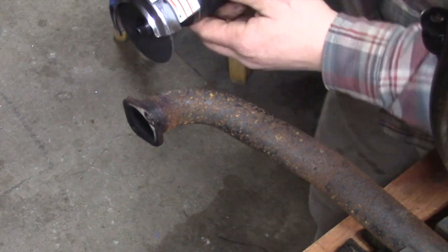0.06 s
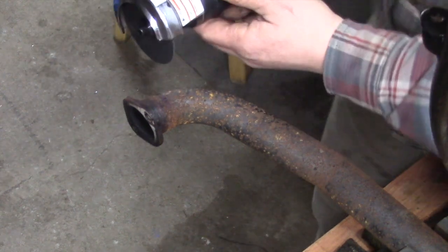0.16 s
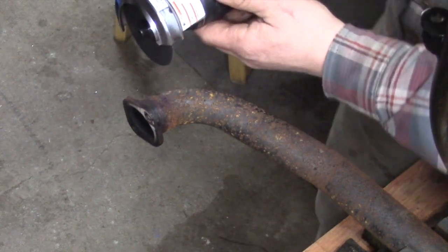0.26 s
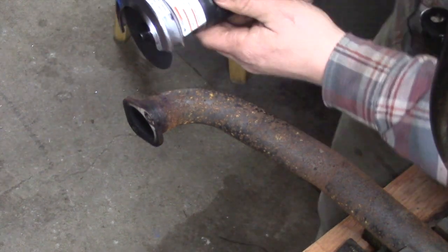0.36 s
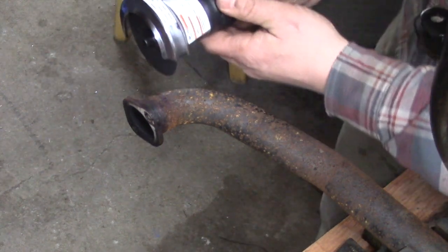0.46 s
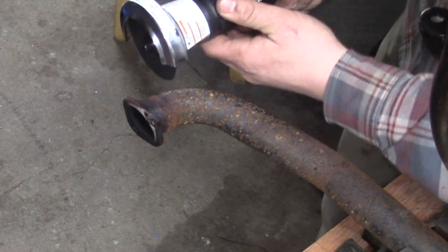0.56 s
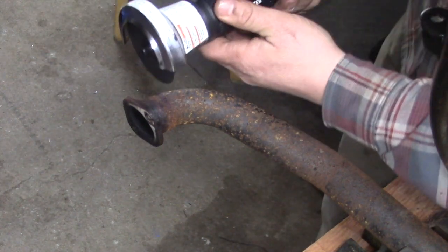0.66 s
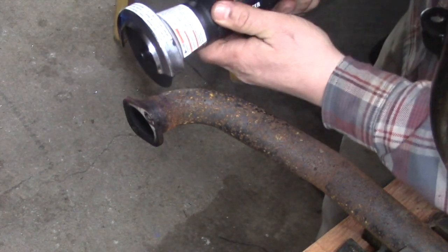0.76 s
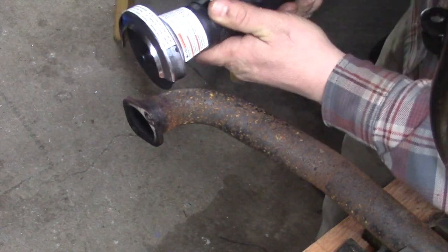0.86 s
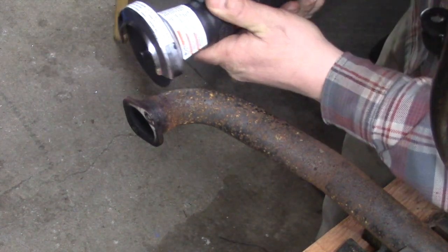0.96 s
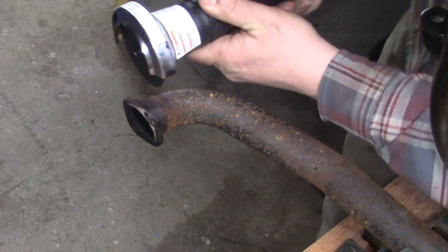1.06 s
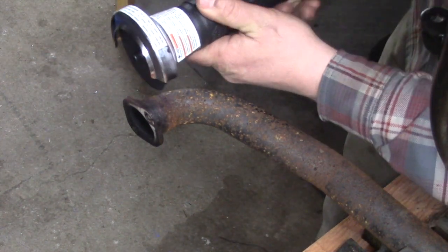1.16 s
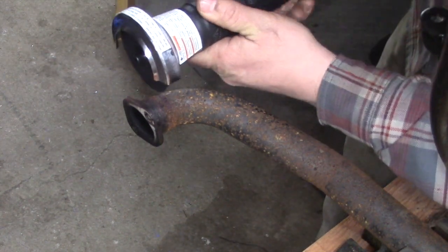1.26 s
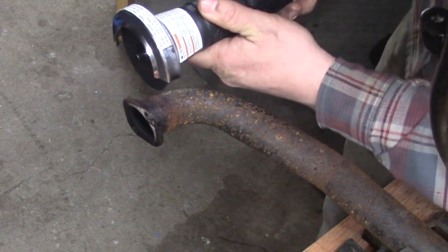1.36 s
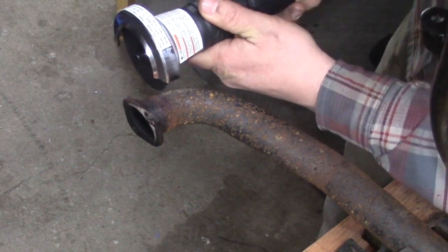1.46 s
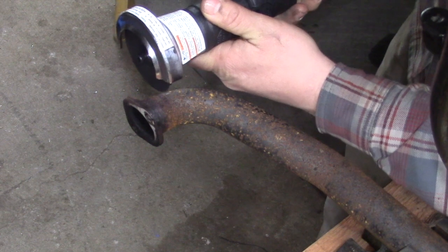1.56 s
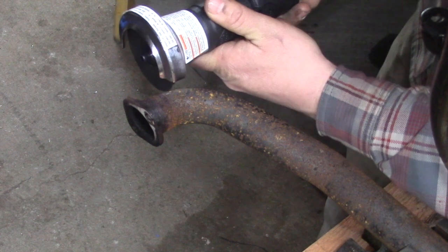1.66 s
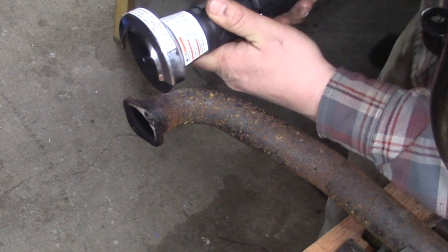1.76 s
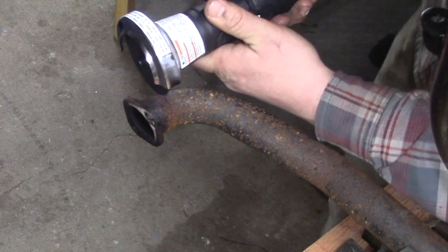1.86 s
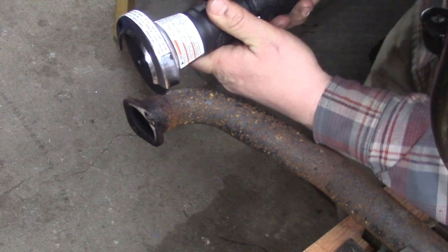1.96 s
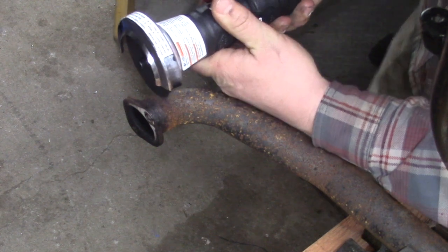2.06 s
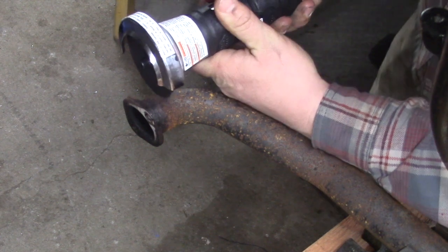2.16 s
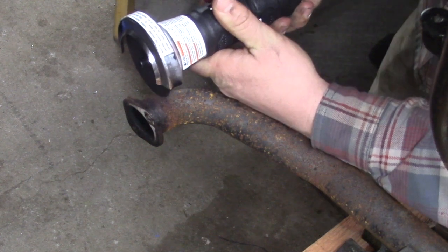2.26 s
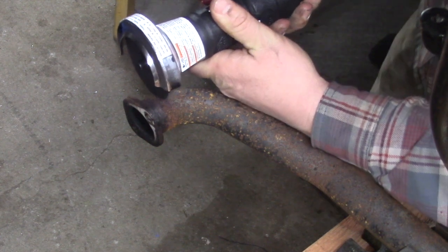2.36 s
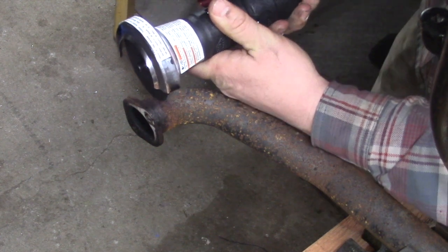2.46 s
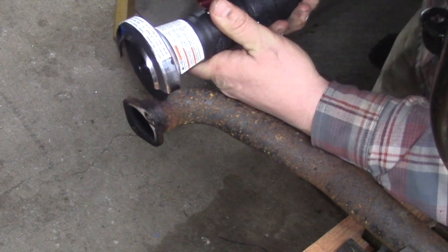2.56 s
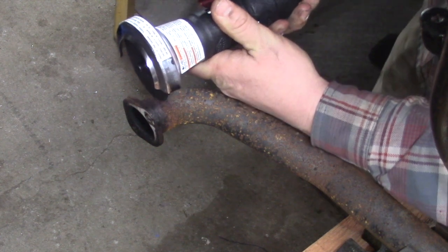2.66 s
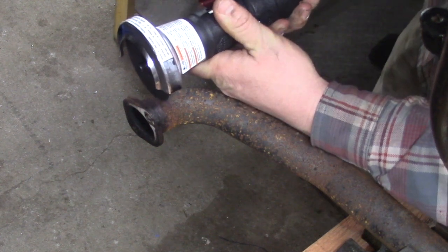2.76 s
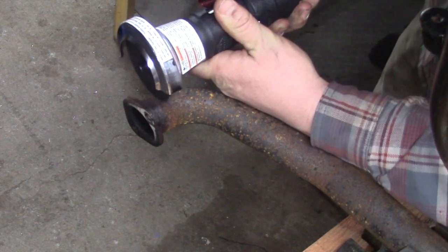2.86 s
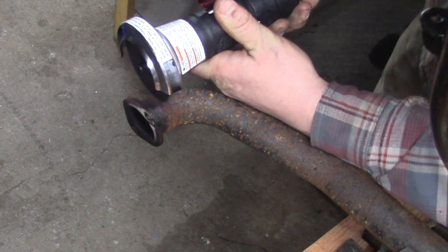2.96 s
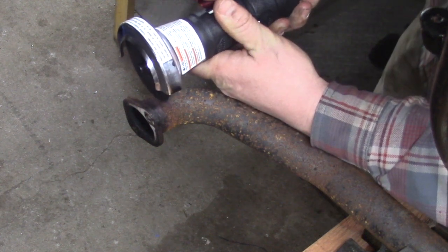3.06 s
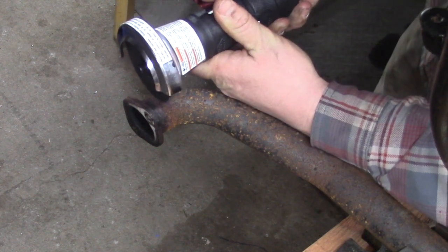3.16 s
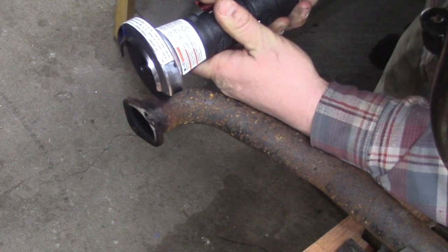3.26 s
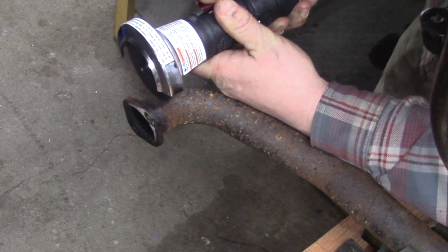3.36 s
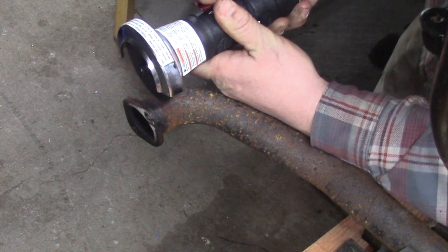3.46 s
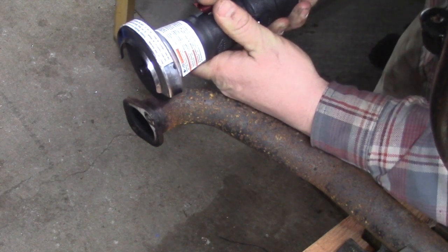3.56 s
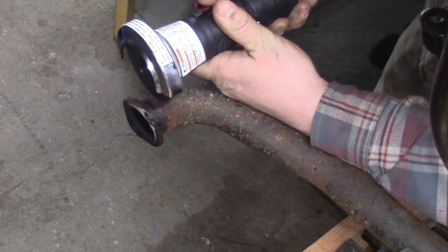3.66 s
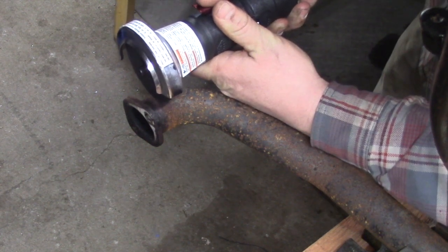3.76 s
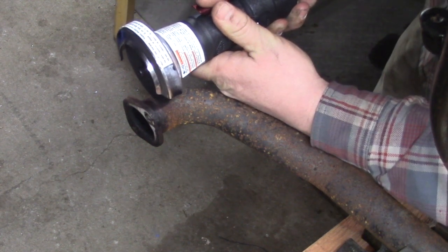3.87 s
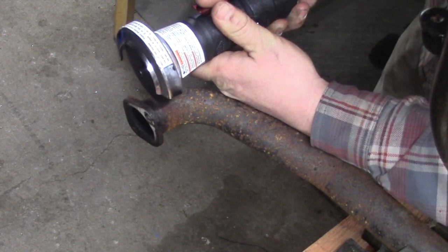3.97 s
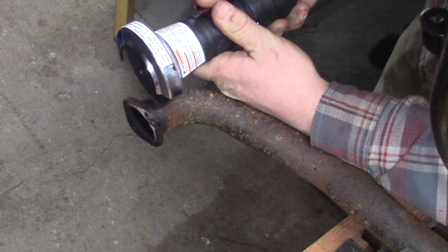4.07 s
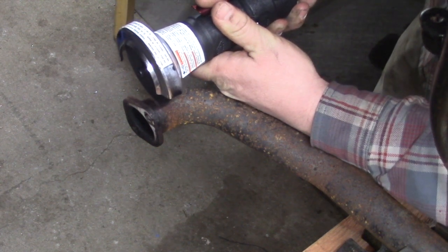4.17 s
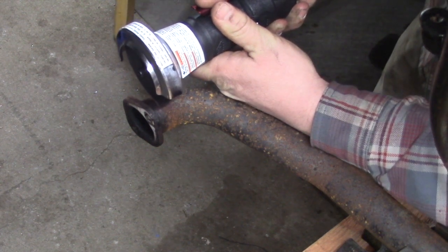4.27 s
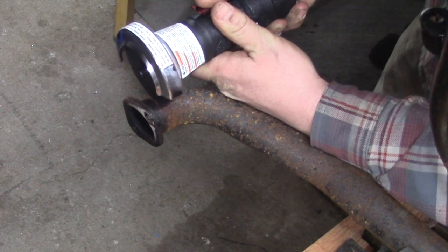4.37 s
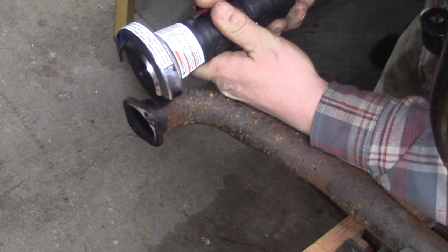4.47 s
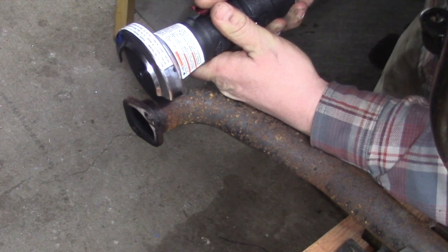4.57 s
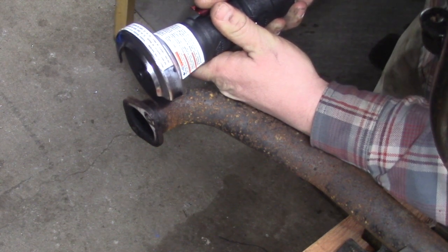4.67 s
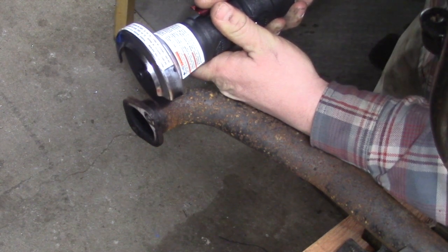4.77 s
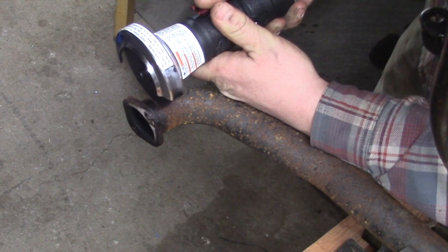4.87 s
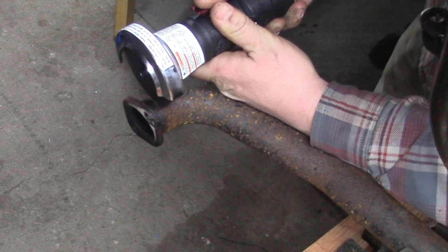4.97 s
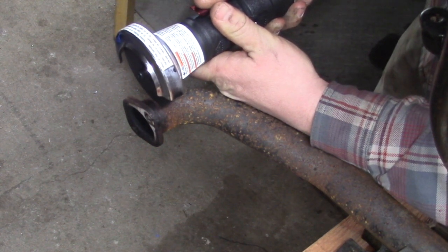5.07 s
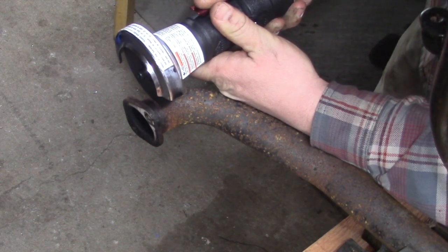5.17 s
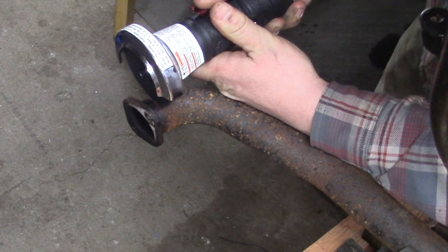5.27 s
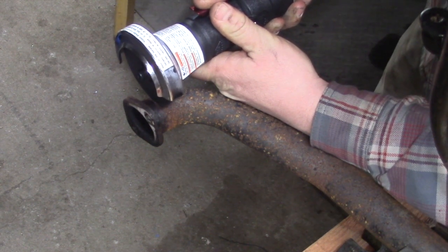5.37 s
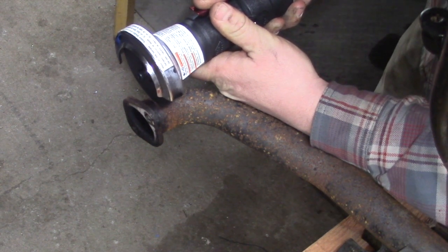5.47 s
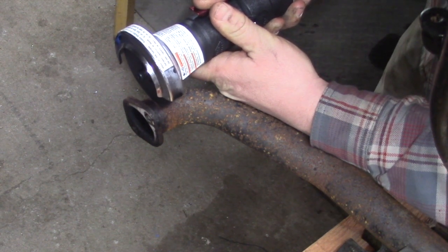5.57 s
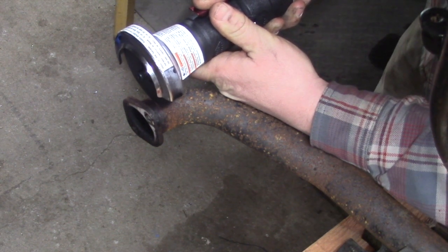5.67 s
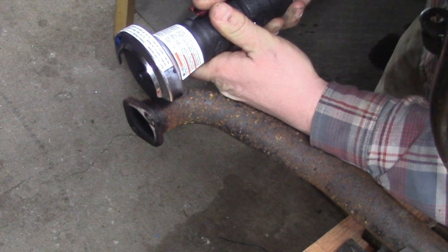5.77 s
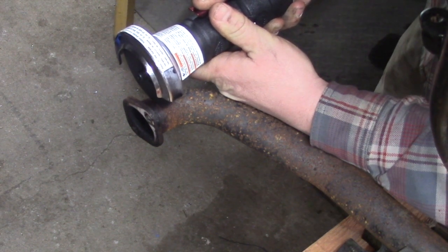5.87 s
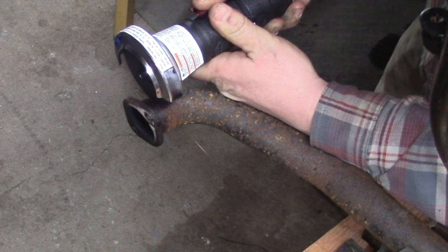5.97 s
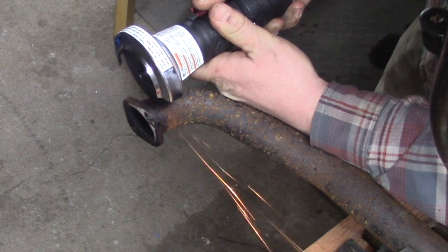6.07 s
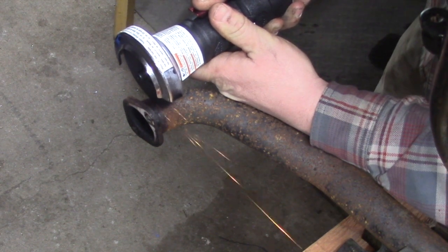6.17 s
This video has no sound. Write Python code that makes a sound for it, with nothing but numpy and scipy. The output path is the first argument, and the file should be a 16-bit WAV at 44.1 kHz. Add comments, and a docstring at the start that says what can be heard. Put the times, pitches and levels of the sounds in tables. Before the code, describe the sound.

Sleeves rustle and a lever clicks in a quiet workshop, then an air-powered cutting tool sputters, whines up loud and finally grazes steel.

```python
"""In a workshop, heard by one close microphone: hands and sleeves rustle over the room's faint noise,
with light taps, scuffs, clicks of the safety lever and dull pops as a pneumatic cut-off tool is handled.
The valve opens: leaking air rings the exhaust, the first vanes kick over and sputter, and the four-vane
motor spins up to a loud whine, made of harmonics of the vane rate over pulsing, hissing noise.
Gusts of exhaust air buffet the microphone; at last the wheel grazes a steel pipe with scraping noise."""
import sys
import numpy as np
from scipy import signal
from scipy.fft import rfft, irfft, next_fast_len
from scipy.io import wavfile

SR = 44100
rng = np.random.default_rng(int(sys.argv[2]) if len(sys.argv) > 2 else 0)


def dump_mix(stems):
    """Bounce the given channels to the path in sys.argv[1] as a 16-bit WAV at rate SR."""
    frames = np.atleast_2d(stems).T  # one column per channel
    limited = np.clip(frames, -1, 1)  # hard clip at full scale
    pcm = np.round(limited * 32767).astype(np.int16)
    wavfile.write(sys.argv[1], SR, pcm)


N = 274522
TIME = np.arange(N) / SR
STEP = 40   # samples between the points of a slow control


def from_db(db):
    """Decibels to gain."""
    return 10 ** (np.asarray(db) / 20)


def rms_one(x):
    """Scale to rms 1."""
    return x / np.sqrt(np.mean(x ** 2) + 1e-20)


def curve(rows):
    """A value at every sample, joined by straight lines from rows of time and value."""
    s, value = np.transpose(rows)
    return np.interp(TIME, s, value)


def slow_chance(rate):
    """Smooth random control of rms 1, one value every STEP samples; a higher rate in Hz moves faster."""
    r = np.exp(-2 * np.pi * STEP * rate / SR)
    settle = 2000   # values dropped while the filter settles
    chance = rng.standard_normal(len(TIME[::STEP]) + settle)
    return rms_one(signal.lfilter([1], [1, -2 * r, r * r], chance)[settle:])


def every_sample(control):
    """A slow control joined by straight lines."""
    return np.interp(TIME, TIME[::STEP], control)


def drift(rate):
    """Slow chance at every sample."""
    return every_sample(slow_chance(rate))


def swell(s, db, rise, fall):
    """A gain that grows exponentially to its peak at s and dies away; rise and fall are time constants."""
    return from_db(db) * np.exp(-np.maximum((s - TIME) / rise, (TIME - s) / fall))


def noise(spectrum):
    """Noise of a given colour, rms 1, rolling off beyond both ends of the spectrum."""
    hz, db = np.transpose(spectrum)
    size = next_fast_len(N, real=True)
    f = np.maximum(np.arange(size // 2 + 1) * SR / size, 1)
    skirts = np.minimum(f / hz[0], 1) ** 2 * np.minimum(hz[-1] / f, 1) ** 2
    gain = from_db(np.interp(np.log(f), np.log(hz), db)) * skirts
    return rms_one(irfft(rfft(rng.standard_normal(size)) * gain, size)[:N])


def impulses(times, heights):
    """Single-sample blows."""
    out = np.zeros(N)
    out[(np.asarray(times) * SR).astype(int)] = heights
    return out + 1e-18   # inaudible offset


def ring(blows, hz, t60):
    """A unit blow sets a decaying sine of initial height 1 ringing; t60 is its 60 dB decay in seconds."""
    r = from_db(-60 / (t60 * SR))
    w = 2 * np.pi * hz / SR
    return signal.lfilter([0, np.sin(w)], [1, -2 * r * np.cos(w), r * r], blows)


def tone(turns):
    """A cosine of the given count of turns."""
    return np.cos((2 * np.pi * (turns % 1)).astype(np.float32))


def high_pass(x, hz):
    """Second-order cut of the bass."""
    return signal.sosfilt(signal.butter(2, hz, "high", fs=SR, output="sos"), x)


def workshop(x, t60, wet_db):
    """Add a diffuse, decaying noise tail that starts with the bounce off the floor, 6 ms late."""
    t = TIME[:SR // 2]
    tail = rng.standard_normal(len(t)) * from_db(-60 * t / t60) * (t > .006)
    return x + from_db(wet_db) * signal.fftconvolve(x, tail / np.linalg.norm(tail))[:N]


# colour of the room's background noise: pitch_hz, density_db (per Hz)
SHOP_COLOUR = [(20, 2.5), (45, -2.5), (130, -4), (300, -8.5), (600, -16.5), (1800, -21), (5000, -24.5),
               (12000, -29), (16000, -34)]
SHOP_DB = -55   # rms


def shop_noise():
    """The workshop itself: steady noise, heaviest in the bass."""
    return from_db(SHOP_DB) * noise(SHOP_COLOUR)


# hands and sleeves on the move: peak_s, level_db, rise_s, fall_s
RUSTLE_MOVES = [(.02, -54.5, .1, 0.14), (.4, -54, 0.26, 0.29), (.8, -52, 0.28, 0.27),
                (1.48, -57.5, 0.27, .25), (2.68, -57, 0.59, 1)]
# colour of cloth and skin: pitch_hz, density_db (per Hz)
CLOTH_COLOUR = [(150, -12), (300, 0.5), (700, -5), (1600, -7), (2600, -11.5), (6000, -20), (15000, -39)]


def rustle(grain_db):
    """Cloth and skin rub unevenly on the tool with each move of the arms; overlapping moves add in power."""
    level = np.sqrt(sum(swell(*move) ** 2 for move in RUSTLE_MOVES))
    return level * from_db(grain_db * drift(60)) * noise(CLOTH_COLOUR)


# light taps of fingers and hose: start_s, level_db (initial ring height), pitch_hz, decay_s (60 dB)
TAP_RINGS = [(.097, -38, 700, 0.016), (.0975, -36, 1700, .008), (.332, -36, 1550, .01),
             (.333, -45, 3580, .008), (.435, -46, 3800, .01), (.575, -34, 1300, 0.0088),
             (.779, -35, 650, 0.011), (.78, -37, 3600, .006), (.821, -40, 6800, .003),
             (1.017, -33, 2000, 0.0073), (1.955, -33, 1450, .012), (1.982, -42, 2120, 0.049)]


def taps():
    """Each tap rings briefly at the pitch of the spot it lands on."""
    return sum(ring(impulses([s], from_db(db)), hz, t60) for s, db, hz, t60 in TAP_RINGS)


# scuffs as the grip shifts: peak_s, level_db, rise_s, fall_s, centre_hz
GRIP_SCUFFS = [(.1, -49.5, 0.012, 0.066, 860), (1.958, -44.5, 0.034, 0.05, 1480)]


def scuffs(grain_db):
    """Short grainy rubs of noise that swell and die away."""
    out = 0
    for s, db, rise, fall, hz in GRIP_SCUFFS:
        colour = [(.08 * hz, -3), (0.97 * hz, -5), (hz, 0), (1.14 * hz, 0),
                  (2 * hz, -11), (4 * hz, -16), (9 * hz, -32)]
        out = out + swell(s, db, rise, fall) * from_db(grain_db * drift(200)) * noise(colour)
    return out


# snaps of the safety lever: start_s, low_modes_db, high_modes_db
LEVER_CLICKS = [(1.3094, -38, -15), (1.3108, -51, -18.5), (1.4923, -32, -32), (1.598, -53, -40)]
# modes of the tool housing: pitch_hz, level_db (added to that of the click), decay_s (60 dB)
HOUSING_MODES = [(1686, -1, 0.051), (2100, 5.5, .008), (6500, -29, .003), (7550, 4, 0.0062),
                 (8700, -10, 0.0043), (13500, -21, .002)]


def clicks(split_hz):
    """Each click rings the low and the high modes of the housing at its own two levels."""
    s, low_db, high_db = np.transpose(LEVER_CLICKS)
    out = 0
    for hz, db, t60 in HOUSING_MODES:
        click_db = low_db if hz < split_hz else high_db
        mode = ring(impulses(s, from_db(db + click_db)), hz, t60)
        out = out + high_pass(mode, 1.08 * hz)   # so small a body sheds no bass
    return out


# dull pops: start_s, signed_height (before the treble is softened)
PRESSURE_STEPS = [(2.267, 0.018), (2.365, -.024), (2.3805, 0.089), (2.3827, -0.042)]


def pops(relax_s, edge_hz):
    """Steps of pressure that relax within milliseconds."""
    relaxing = [1, -np.exp(-1 / (relax_s * SR))]
    steps = signal.lfilter([1], relaxing, impulses(*np.transpose(PRESSURE_STEPS)))
    return signal.sosfilt(signal.butter(1, edge_hz, fs=SR, output="sos"), steps)


def port_whistle(centre_hz, t60):
    """Turbulence rings a cavity of the exhaust, here two equal resonators in a row: a breathy fixed pitch."""
    once = ring(rng.standard_normal(N), centre_hz, t60)
    return rms_one(ring(once, centre_hz, t60))


VALVE_OPENS_S, VALVE_FULL_S = 3.083, 3.225   # the lever is squeezed
# cavities rung by the first air: pitch_hz, level_db (relative), decay_s (60 dB, each resonator)
LEAK_CAVITIES = [(1500, 4, 0.0047), (2500, -0.5, 0.0059), (4330, -2, 0.0041), (5360, -7, .005),
                 (9370, -2.5, 0.0071), (10900, -20, .005), (14100, -19, .005)]
LEAK_S = 3.18   # strongest just as the rotor stirs
LEAK_DB, LEAK_RISE_S, LEAK_FALL_S = -30, 0.051, 0.037


def leak():
    """The first air leaks past the standing vanes: a hollow, breathy whistle while the valve is barely open."""
    unsealed = np.interp(TIME, [VALVE_OPENS_S, LEAK_S], [0, 1])
    chord = sum(from_db(db) * port_whistle(hz, t60) for hz, db, t60 in LEAK_CAVITIES)
    return unsealed * swell(LEAK_S, LEAK_DB, LEAK_RISE_S, LEAK_FALL_S) * chord


# speed that the air supply allows as the lever is pressed home: time_s, vane_rate_hz
ALLOWED_SPEED = [(3.5, 658), (3.6, 682), (3.8, 791), (3.9, 827), (4.02, 838), (4.5, 855.5), (4.82, 870),
                 (5.14, 902), (5.55, 905), (5.78, 916.5), (5.95, 919), (6.13, 918), (6.22, 912)]
START_S, SPIN_UP_S = 3.212, .11   # the rotor breaks free; time constant of its inertia


def vane_rate():
    """Inertia makes the rotor approach the allowed speed exponentially."""
    turning = np.maximum(TIME - START_S, 0)
    return curve(ALLOWED_SPEED) * (1 - np.exp(-turning / SPIN_UP_S))


# vane rates between which the strain falls away: start_hz, end_hz
STRAIN_ENDS_HZ = [770, 805]


def straining(vane_hz):
    """1 while the motor gathers speed under full torque, 0 once it runs free."""
    return np.interp(vane_hz, STRAIN_ENDS_HZ, [1, 0])


# the exhaust swings toward the microphone: peak_s, level_db, rise_s, fall_s
EXHAUST_GUSTS = [(3.79, -54, .05, .15), (5.28, -34, 0.72, 0.11), (6.21, -41, 0.072, .1)]
# colours of the air on the microphone, the roar and the hiss: pitch_hz, density_db (per Hz)
BUFFET_COLOUR = [(25, -2), (80, -1), (200, 0.5), (450, 0), (900, -4), (2000, -26)]
ROAR_COLOUR = [(120, -42), (400, -15), (700, -7), (1200, -5), (1700, 0), (2350, 3.5), (2650, -6),
               (2900, -14.5), (4500, -17.5)]
HISS_COLOUR = [(1500, -29), (2900, -0.5), (3500, 3.5), (5000, 1), (6500, -0.5), (8000, 3.5), (8800, -1),
               (9400, 3.5), (10300, -0.5), (12500, -5.5), (14000, -6), (15000, -17), (16000, -23)]
ROAR_DB, HISS_DB = -29, -26.5   # the jet at free speed
RUN_UP_ROAR_DB, RUN_UP_HISS_DB = 6, 3   # extra while the motor gathers speed and gulps air


def exhaust_air(vane_turns, vane_hz, pulsing, gust_db, gust_roar_db, wander_db, whistle_db):
    """The jet roars, hisses and whistles in step with the vanes; aimed at the microphone, it buffets it."""
    valve = np.clip((TIME - VALVE_OPENS_S) / (VALVE_FULL_S - VALVE_OPENS_S), 0, 1) ** 3
    gulping = straining(vane_hz)
    gusts = sum(swell(*gust) for gust in EXHAUST_GUSTS)
    # the roar also grows when the exhaust points at the microphone
    roar_level = from_db(ROAR_DB + RUN_UP_ROAR_DB * gulping) + from_db(gust_roar_db) * gusts
    roar = roar_level * noise(ROAR_COLOUR)
    hiss_level = from_db(HISS_DB + RUN_UP_HISS_DB * gulping + wander_db * drift(5.5))
    whistle = from_db(whistle_db) * port_whistle(centre_hz=9400, t60=0.0066)
    hiss = hiss_level * (noise(HISS_COLOUR) + whistle)
    buffet = gusts * from_db(gust_db * drift(24)) * noise(BUFFET_COLOUR)
    return valve * ((roar + hiss) * (1 + pulsing * tone(vane_turns)) + buffet)


# the first vanes kick over: start_s, level_db (added to that of each mode)
VANE_KICKS = [(3.1856, -15), (3.192, -5.5), (3.2171, -5), (3.229, -7)]
# modes of the exhaust: pitch_hz, level_db (relative), decay_s (60 dB)
KICKED_MODES = [(126, -21, 0.061), (420, -25, 0.0066), (694, 7.5, 0.005), (1300, -1.5, 0.0091),
                (2430, -6, 0.012), (4330, -11.5, 0.015)]


def kicks(low_cut_hz):
    """The first vanes flip over one by one and ring the exhaust, which sheds no deep bass."""
    s, db = np.transpose(VANE_KICKS)
    rings = 0
    for k, (hz, mode_db, t60) in enumerate(KICKED_MODES):
        sign = (-1) ** k   # neighbouring modes start in opposite directions
        rings = rings + sign * ring(impulses(s, from_db(db + mode_db)), hz, t60)
    return high_pass(rings, low_cut_hz)


# level of the whine's fundamental: time_s, level_db (rms, before flutter)
FUNDAMENTAL_LEVEL = [(3.24, -23), (3.29, -11.5), (3.45, -13.5), (3.86, -9.5), (4.04, -14), (4.63, -14),
                     (4.73, -11), (5.07, -12.5), (5.16, -16), (5.47, -13.5), (5.75, -16), (5.89, -12),
                     (6.16, -12), (6.22, -14)]
# harmonics 2 to 8 of a vane's puff, before the passage: free_db (running free), torque_db (full torque)
PUFF_OVERTONES = [(-1.5, 2.5), (-5, -4), (-11, -9), (-10.5, -9), (-13.5, -13), (-22, -13), (-19, -23.5)]
# resonances of the exhaust passage: centre_hz, width_hz (half power), peak_db
PASSAGE_RESONANCES = [(610, 700, -15), (1225, 360, -21), (2402, 263, -11.5), (3350, 290, -18),
                      (4200, 166, -13.5), (5330, 240, -18), (6000, 120, -18), (7060, 1900, -17)]
# one overtone dips for a moment: middle_s, harmonic, depth_db, half_length_s
OVERTONE_FADES = [(4.5, 2, -11, .04), (4.89, 3, -6, .07), (5.7, 3, -9, .06), (5.82, 2, -8, .05)]


def passage_gain(hz):
    """Gain of the exhaust passage: its resonances add in power."""
    power = 0
    for centre, width, db in PASSAGE_RESONANCES:
        power = power + from_db(db) ** 2 / (1 + (2 * (hz - centre) / width) ** 2)
    return np.sqrt(power)


def fade_db(harmonic):
    """The brief fades of one overtone, as a slow control."""
    t = TIME[::STEP]
    return sum(db * np.exp(-((t - s) / length) ** 2)
               for s, k, db, length in OVERTONE_FADES if k == harmonic)


def whine(vane_turns, vane_hz, flutter_db, wander_db, fundamental_db, skew):
    """Each vane puffs lopsidedly, shaped by torque and passage; turbulence makes the overtones flutter."""
    level_db = curve(FUNDAMENTAL_LEVEL) + fundamental_db + flutter_db * drift(15.4)
    out = from_db(level_db) * tone(vane_turns + skew)
    speed = vane_hz[::STEP]
    for k, (free_db, torque_db) in enumerate(PUFF_OVERTONES, 2):
        db = free_db + (torque_db - free_db) * straining(speed) + fade_db(k)
        db = db + wander_db * slow_chance(2.6) + flutter_db * np.sqrt(k) * slow_chance(23)
        gain = every_sample(from_db(db) * passage_gain(k * speed))
        out = out + gain * tone(k * vane_turns + skew * k * k)   # growing phase skews the puff
    return np.sqrt(2) * out   # gains become rms levels


def wobble(shaft_turns, vane_hz, once, twice):
    """Under torque the four vanes seal unequally, so the puffs growl at the shaft rate."""
    unequal = once * tone(shaft_turns) + twice * tone(2 * shaft_turns)
    return 1 + straining(vane_hz) * unequal


# rotor and bearings: shaft_multiple, low_db (at the lower speed), full_db (at full speed); base levels
ROTOR_LINES = [(3, -45, -45), (5, -36, -36), (7, -41, -47), (10, -46.5, -38), (11, -31.5, -35),
               (14, -41, -37.5), (15, -38.5, -37), (19, -39, -42.5), (26, -48, -32), (29, -57, -36.5),
               (48, -41, -64), (50, -41.5, -37), (54, -37, -32), (56, -34, -45)]
LOWER_SPEED_HZ, FULL_SPEED_HZ = 215, 229.2   # shaft turns per s
PORT_HZ, PORT_WIDTH_HZ, PORT_DB = 9410, 400, 11   # narrow resonance of the exhaust port


def rotor(turns, shaft_hz, weak_db, vane_db, run_up_db, wander_db, flutter_db, top_hz, top_loss_db):
    """No two vanes are alike, so multiples of the shaft speed sing; their balance shifts with speed."""
    listed = {round(k): (low, full) for k, low, full in ROTOR_LINES}
    speed = shaft_hz[::STEP]
    fast = np.clip((speed - LOWER_SPEED_HZ) / (FULL_SPEED_HZ - LOWER_SPEED_HZ), 0, 1)
    running_up = np.interp(speed, [170, 205], [1, 0])
    out = 0
    for k in range(3, 61):
        of_vanes = k % 4 == 0
        if of_vanes and k <= 32:
            continue   # these belong to the whine
        low, full = listed.get(k, [weak_db + vane_db * of_vanes] * 2)
        db = low + (full - low) * fast + wander_db * slow_chance(4.15) + flutter_db * slow_chance(14.6)
        db = db + running_up * run_up_db   # weaker during the run-up
        # a line swells as it crosses the port resonance
        db = db + PORT_DB * np.exp(-((k * speed - PORT_HZ) / PORT_WIDTH_HZ) ** 2)
        # it loses top_loss_db an octave above top_hz
        octaves_above = np.maximum(np.log2(k * speed / top_hz), 0)
        gain = every_sample(from_db(db - top_loss_db * octaves_above))
        out = out + gain * tone(k * turns + rng.random())
    return np.sqrt(2) * out


# shaking once, then twice a turn: level_db (rms, away from the swell), swell_db, critical_hz, width_hz
UNBALANCE_SHAKES = [(-42.5, 9, 214.5, 9.8), (-45, 15.5, 216, 5.6)]


def unbalance(turns, shaft_hz):
    """The unbalanced wheel hums once and twice a turn, most while it passes the critical speed."""
    hum = 0
    for k, (db, swell_db, critical_hz, width_hz) in enumerate(UNBALANCE_SHAKES, 1):
        nearness = np.exp(-((shaft_hz - critical_hz) / width_hz) ** 2)
        hum = hum + from_db(db + swell_db * nearness) * tone(k * turns + rng.random())
    return np.sqrt(2) * np.minimum(shaft_hz / LOWER_SPEED_HZ, 1) * hum


# colour of the ragged gulps of air: pitch_hz, density_db (per Hz)
SPUTTER_COLOUR = [(110, -16), (170, -14), (330, 6.5), (800, -1), (1200, 0.5), (1800, -10)]
SPUTTER_S = 3.243   # the barely turning motor sputters hardest
SPUTTER_DB, SPUTTER_RISE_S, SPUTTER_FALL_S = -15.5, 0.021, 0.07


def sputter(vane_turns, pulsing):
    """At low speed each vane dumps a ragged gulp of air."""
    level = swell(SPUTTER_S, SPUTTER_DB, SPUTTER_RISE_S, SPUTTER_FALL_S)
    return level * (1 + pulsing * tone(vane_turns)) * noise(SPUTTER_COLOUR)


# colour of the scraped pipe: pitch_hz, density_db (per Hz)
STEEL_COLOUR = [(2500, -26), (4500, -7), (6000, 2), (7300, 9), (8500, -3), (9800, 0), (12000, -14),
                (16000, -28)]
GRAZE_S, GRAZE_ATTACK_S, GRAZE_DB = 6.125, 0.12, -18


def graze(shaft_turns, bite, grit_db):
    """Grit scrapes the steel, hardest once a turn where the wheel stands proud."""
    pressure = np.clip((TIME - GRAZE_S) / GRAZE_ATTACK_S, 0, 1)
    grit = from_db(GRAZE_DB + grit_db * drift(129.7))
    return pressure * grit * (1 + bite * tone(shaft_turns)) * noise(STEEL_COLOUR)


def air_tool():
    """Air leaks in, the motor kicks over and runs up, trembling slightly in speed, and the wheel grazes."""
    vane_hz = vane_rate()
    vane_turns = np.cumsum(vane_hz * (1 + 0.0004 * drift(52))) / SR
    shaft_turns, shaft_hz = vane_turns / 4, vane_hz / 4   # four vanes
    air = exhaust_air(vane_turns, vane_hz, pulsing=0.16, gust_db=0.5, gust_roar_db=-2.5,
                      wander_db=0.75, whistle_db=-12)
    air = air + leak() + sputter(vane_turns, pulsing=0.29)
    start = workshop(kicks(low_cut_hz=70), t60=0.24, wet_db=-7.5)
    motor = whine(vane_turns, vane_hz, flutter_db=0.54, wander_db=1.5, fundamental_db=0.0, skew=0.0676)
    motor = motor * wobble(shaft_turns, vane_hz, once=0.073, twice=0.047)
    motor = motor + rotor(shaft_turns, shaft_hz, weak_db=-45.5, vane_db=5.0, run_up_db=-3.0,
                          wander_db=3.0, flutter_db=1.65, top_hz=10050, top_loss_db=14)
    motor = motor + unbalance(shaft_turns, shaft_hz)
    running = np.interp(TIME, [3.218, 3.24], [0, 1])
    return air + start + running * motor + graze(shaft_turns, bite=0.37, grit_db=4.0)


def scene():
    """Everything reaches both channels alike."""
    knocks = workshop(taps() + clicks(split_hz=5000), t60=0.23, wet_db=-15.5)
    handling = rustle(grain_db=1.1) + knocks + scuffs(grain_db=3.5)
    mono = shop_noise() + handling + pops(relax_s=.0016, edge_hz=11000) + air_tool()
    return np.stack([mono, mono])


CUTOFF_HZ = 15900


def record(dry):
    """The highest peaks are rounded and the top is cut."""
    rounded = dry / (1 + (dry / .95) ** 8) ** (1 / 8)
    return signal.sosfilt(signal.ellip(12, .1, 80, CUTOFF_HZ, fs=SR, output="sos"), rounded)


dry = scene()
out = record(dry)
dump_mix(out)
```